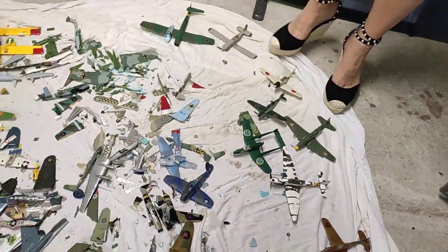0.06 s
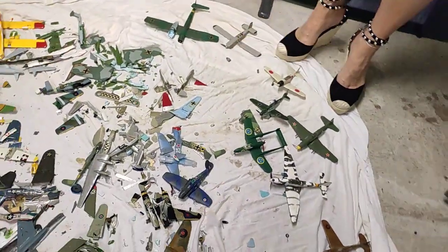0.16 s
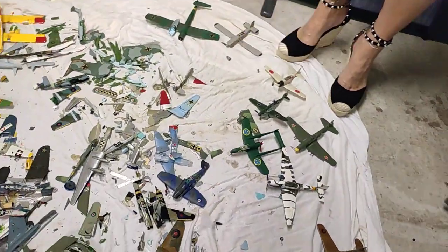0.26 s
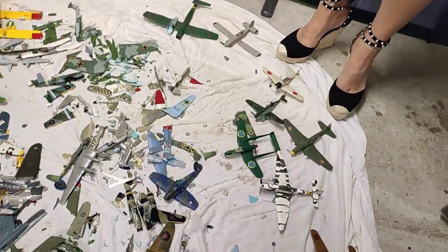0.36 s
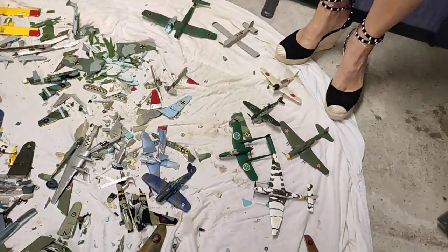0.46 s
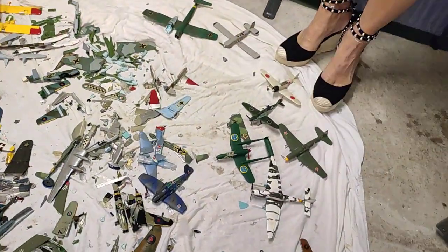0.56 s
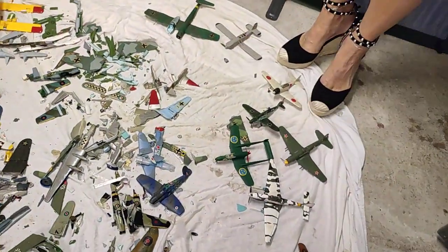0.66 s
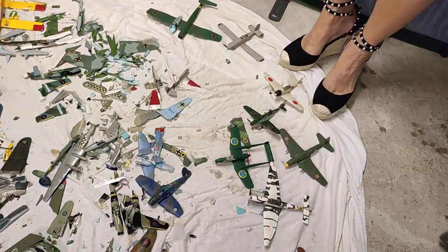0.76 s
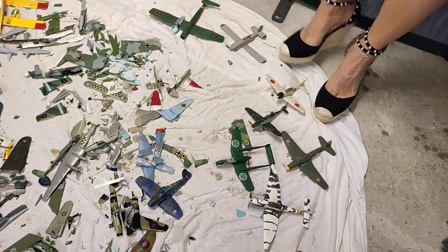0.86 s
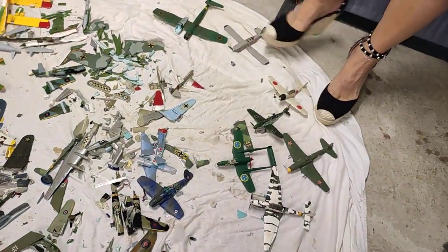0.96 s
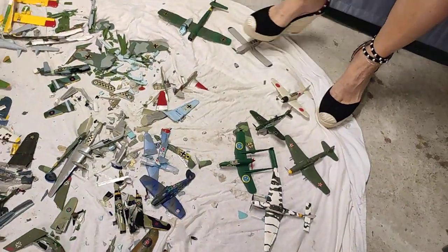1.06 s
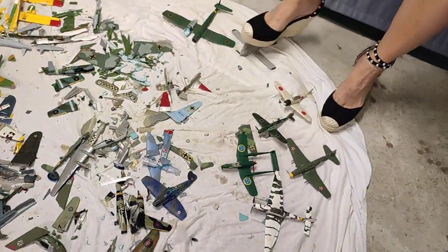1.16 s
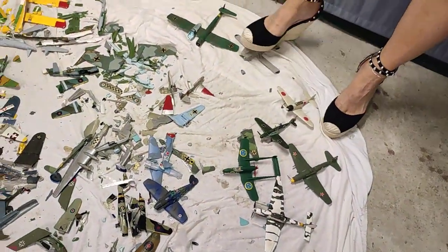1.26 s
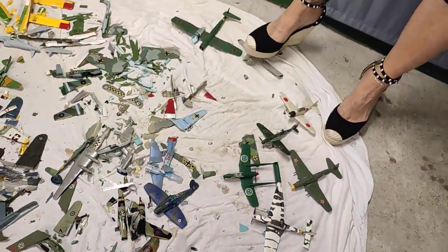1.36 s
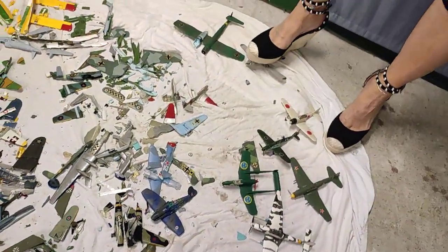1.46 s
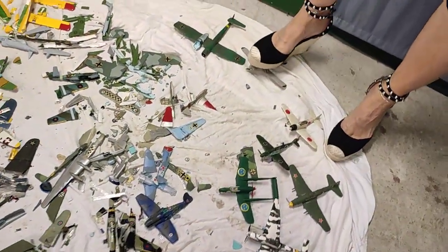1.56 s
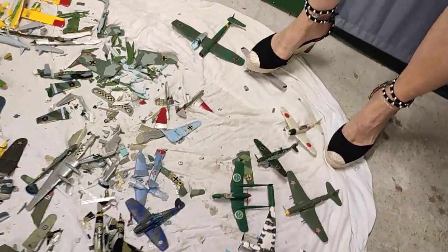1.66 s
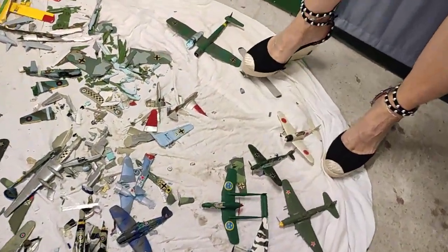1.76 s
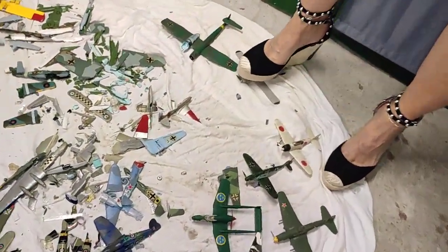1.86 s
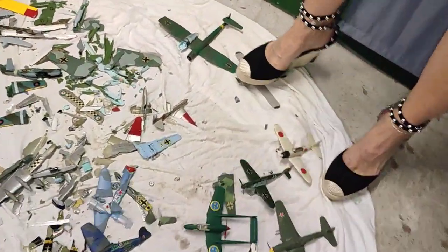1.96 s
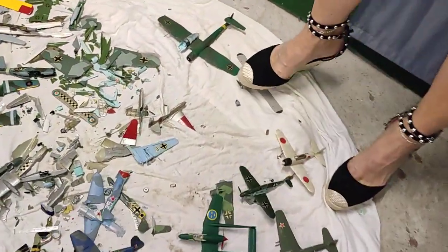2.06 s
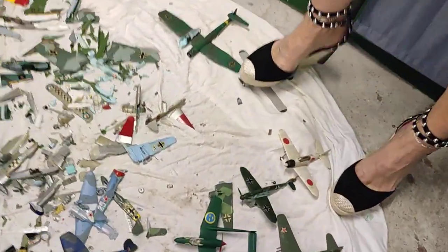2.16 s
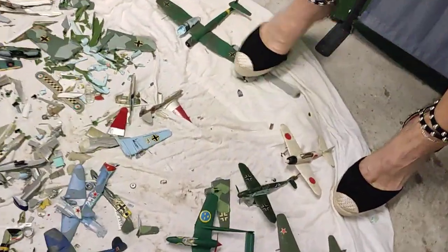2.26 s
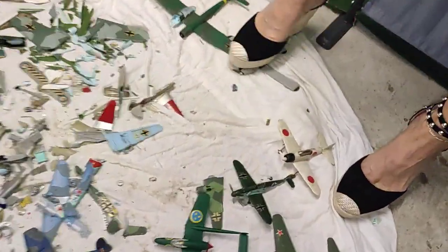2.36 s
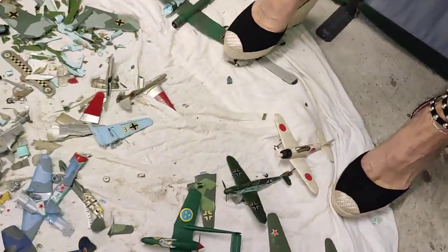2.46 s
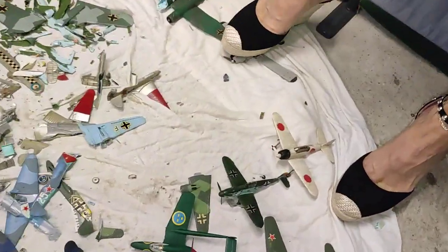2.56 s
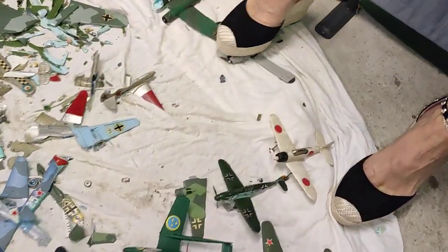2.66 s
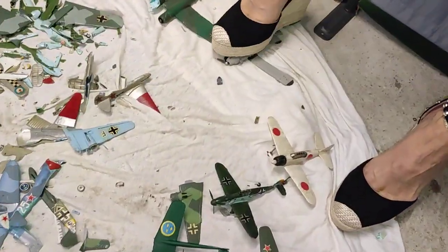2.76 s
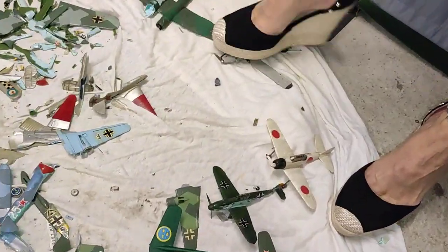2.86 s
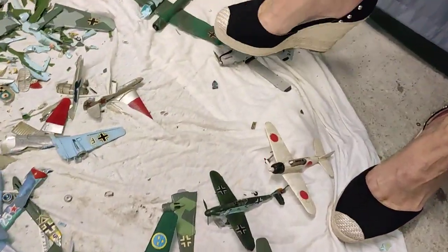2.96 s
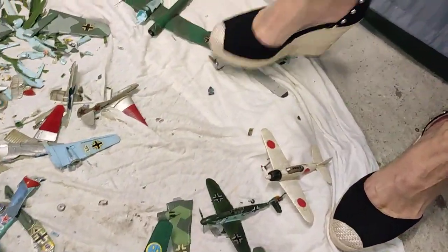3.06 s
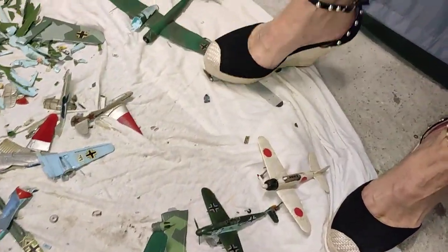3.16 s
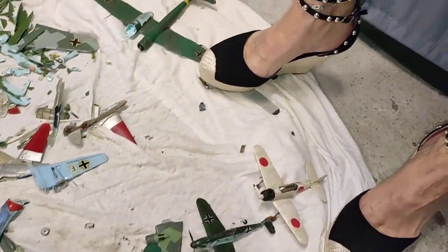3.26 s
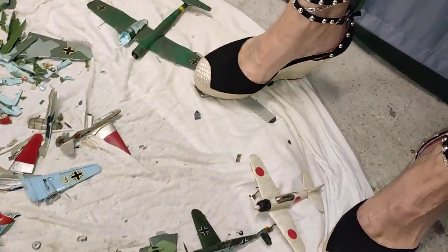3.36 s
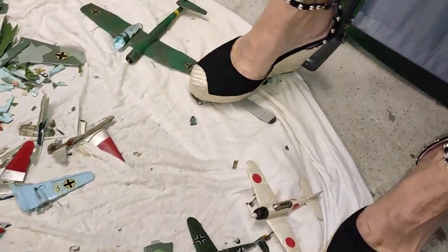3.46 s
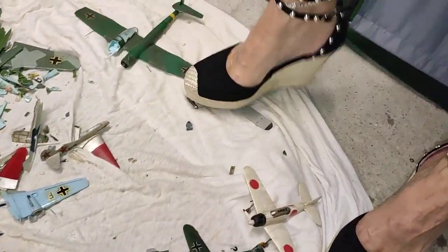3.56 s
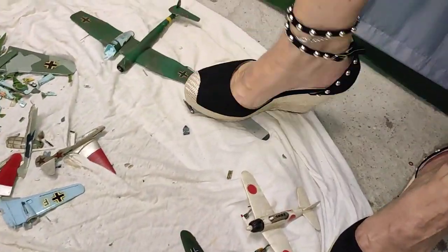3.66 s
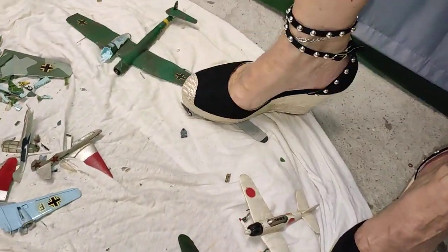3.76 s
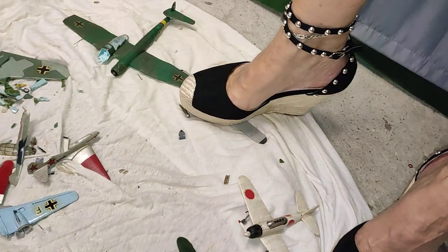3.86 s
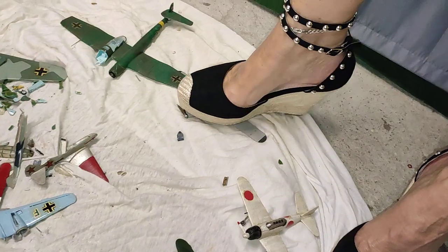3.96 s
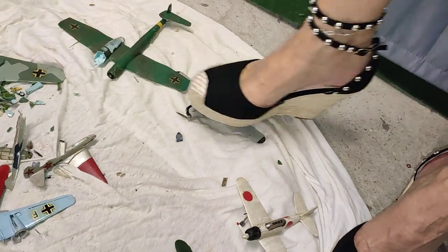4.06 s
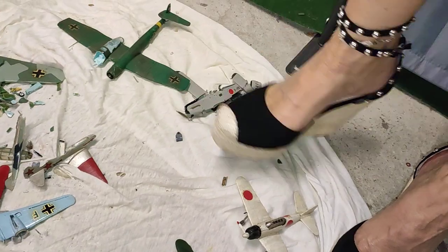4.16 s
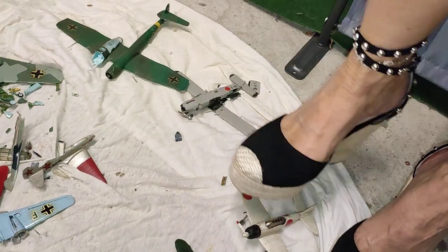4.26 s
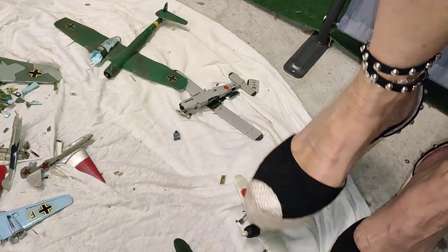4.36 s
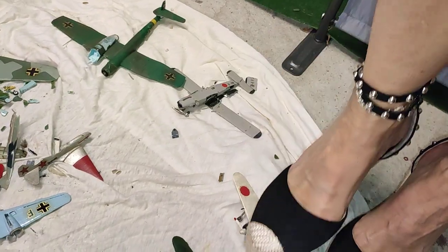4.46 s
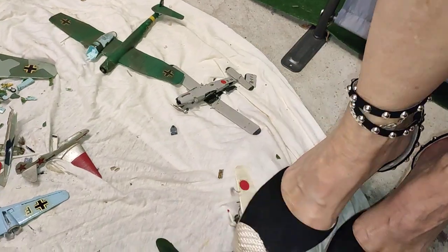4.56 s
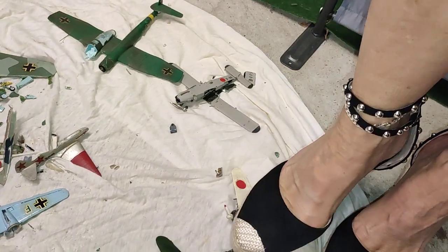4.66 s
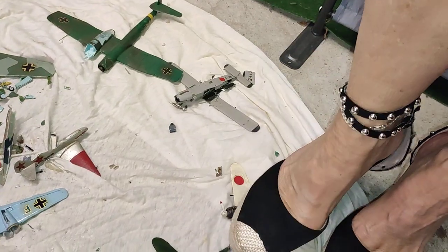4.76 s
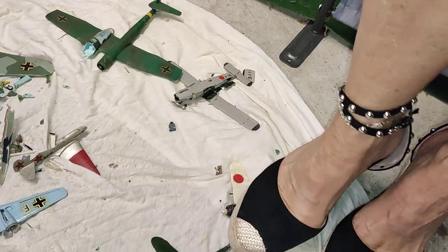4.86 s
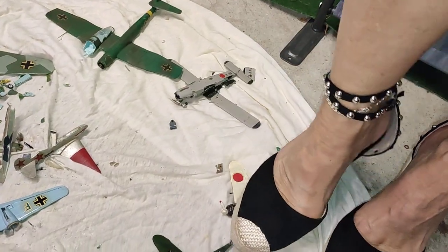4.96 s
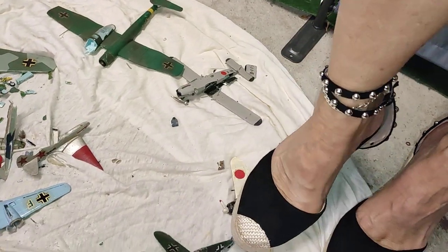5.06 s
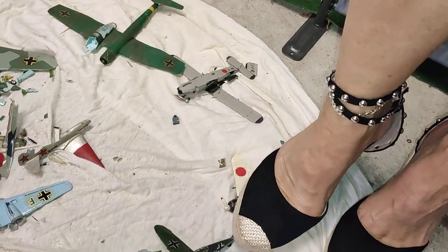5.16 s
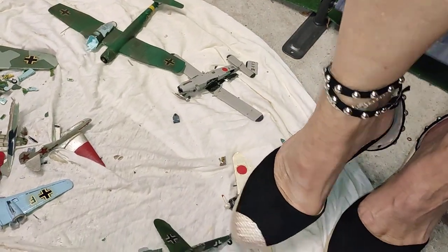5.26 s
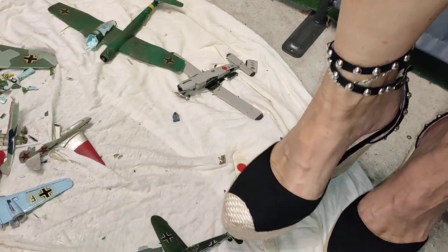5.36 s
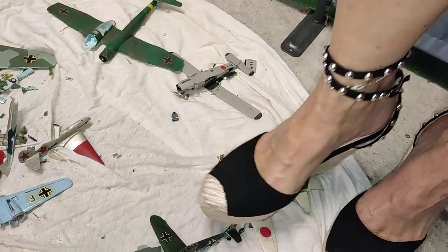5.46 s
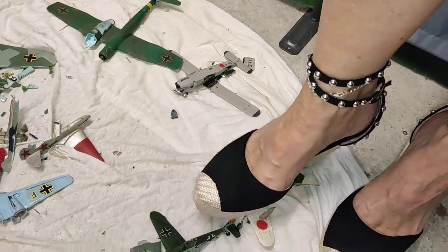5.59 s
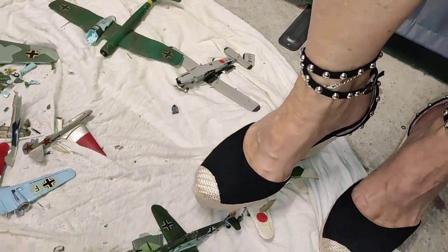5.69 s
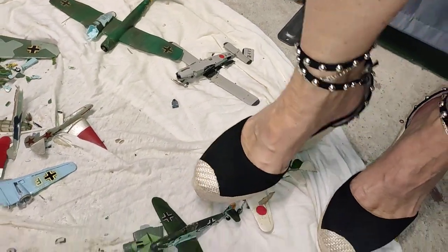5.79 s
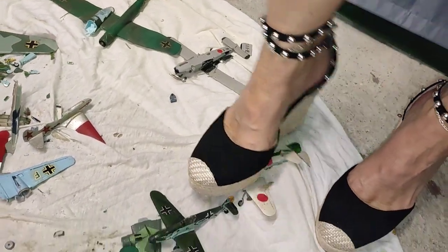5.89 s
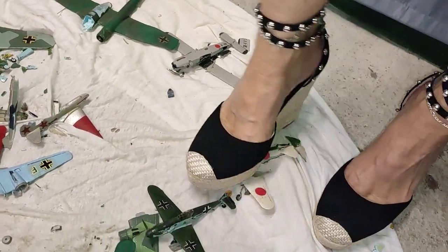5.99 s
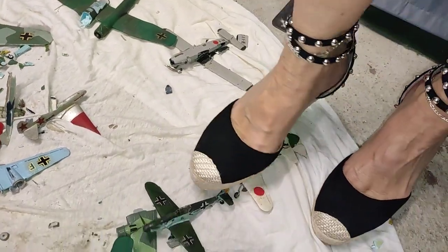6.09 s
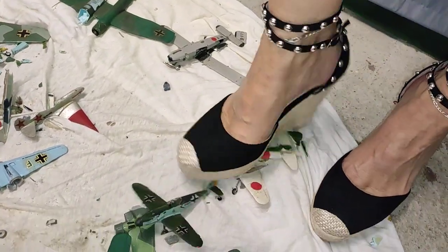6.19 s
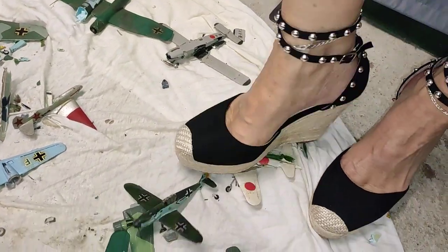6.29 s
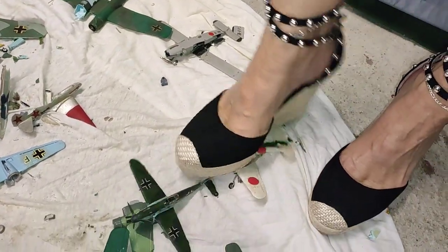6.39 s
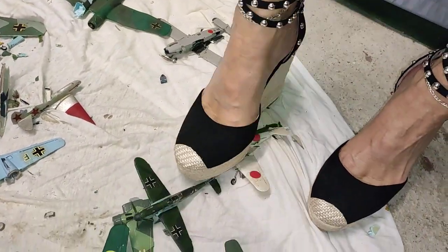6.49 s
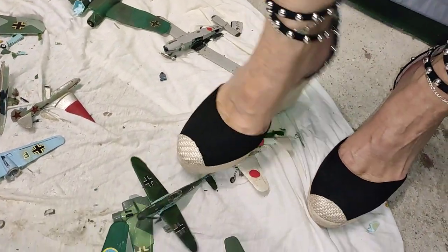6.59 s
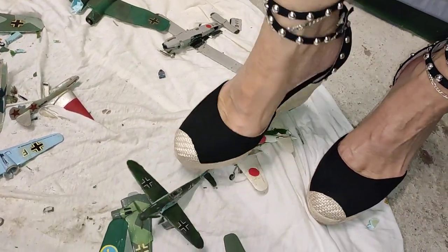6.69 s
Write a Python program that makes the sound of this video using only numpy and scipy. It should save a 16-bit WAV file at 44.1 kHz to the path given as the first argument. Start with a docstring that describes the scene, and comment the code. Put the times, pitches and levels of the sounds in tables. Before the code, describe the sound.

A sandal scuffs softly on a sheet over concrete, with a few faint squeaks further off. Then it treads on a plastic model plane, which breaks in sharp snaps and short crunches with dull thuds. After sparser, softer cracks, a second model caves in with a dense run of snaps and is ground under the sole, splinters crackling. A hand-held phone hears it close by in a small hard room.

```python
"""In a small hard room, a wedge sandal treads on plastic model aircraft lying on a sheet over concrete.
The thin shells give way in single snaps and short crunches, and splinters crackle under the sole.
Each break is a burst of noise plus a few fading tones. The shoe scuffs and thuds.
A few faint, short squeaks come from further off; room air, mains hum and hand rumble lie below.
A hand-held phone close by colours each side differently and turns down the loudest peaks."""
import sys
import numpy as np
from scipy import signal
from scipy.fft import rfft, irfft
from scipy.io import wavfile
from scipy.ndimage import uniform_filter1d, minimum_filter1d

SR = 44100
rng = np.random.default_rng(int(sys.argv[2]) if len(sys.argv) > 2 else 0)


def output_pcm(signal):
    """Save a mono or channel-first signal as 16-bit PCM at the path in sys.argv[1].

    Samples are clipped to [-1, 1] before scaling.
    """
    pcm = np.clip(np.atleast_2d(signal).T, -1, 1) * 32767
    wavfile.write(sys.argv[1], SR, np.round(pcm).astype(np.int16))


N = 296793
TIME = np.arange(N) / SR
CUTOFF_HZ = 14400


def from_db(db):
    """Turn decibels into a number to multiply a sound by."""
    return 10 ** (np.asarray(db) / 20)


def fade(t, fade_s):
    """Die away by 60 dB every fade_s seconds."""
    return from_db(-60 * t / fade_s)


def rms_one(x):
    """Scale a sound to an average strength (rms) of 1."""
    return x / np.sqrt(np.mean(x ** 2) + 1e-20)


def energy_one(x):
    """Scale a burst to the energy of a one-sample click of height 1."""
    return rms_one(x) / np.sqrt(x.shape[-1])


def level(rows):
    """A volume curve through rows of time_s, level_db."""
    return from_db(np.interp(TIME, *np.transpose(rows)))


def band(x, low_hz, high_hz, order=2):
    """Keep the part of a sound between two frequencies."""
    edges_hz = [low_hz, min(high_hz, .45 * SR)]
    return signal.sosfilt(signal.butter(order, edges_hz, "band", fs=SR, output="sos"), x)


def peak(x, hz, sharpness, db):
    """Boost or dip a sound around one frequency."""
    gain, angle = from_db(db / 2), 2 * np.pi * min(hz, .45 * SR) / SR
    width, turn = np.sin(angle) / (2 * sharpness), -2 * np.cos(angle)
    forward = [1 + width * gain, turn, 1 - width * gain]
    feedback = [1 + width / gain, turn, 1 - width / gain]
    return signal.lfilter(forward, feedback, x)


def add(out, start_s, sound):
    """Mix a stereo sound in at start_s."""
    at = max(0, round(start_s * SR))
    out[:, at:at + sound.shape[1]] += sound[:, :max(0, N - at)]


def stereo_noise(size, apart):
    """White noise; the larger apart is, the less alike the two sides are."""
    return rng.standard_normal(size) + apart * rng.standard_normal((2, size))


# The tone colour of the air: frequency_hz, relative_db
AIR_COLOUR = [(12, -42.5), (20, -0.5), (293, -21.5), (678, -24), (1150, -32.5), (2600, -34), (4500, -38.5),
              (8000, -39), (10000, -36), (14200, -38.5), (15000, -62)]


def room_air(level_db=-64.5):
    """Steady, mostly deep noise, a little louder on the right."""
    hz, db = np.transpose(AIR_COLOUR)
    colour = from_db(np.interp(np.log(np.fft.rfftfreq(N, 1 / SR) + 1), np.log(hz), db, left=-90))
    air = rms_one(irfft(rfft(stereo_noise(N, apart=.87)) * colour, N))
    return from_db(level_db) * air * from_db([[-.8], [.8]])


# How loud the hum is: time_s, level_db
HUM_LEVELS = [(0, -83), (2.4, -66), (3.5, -67), (6.73, -66)]


def mains_hum(pitch_hz=99.7):
    """Mains power hums on one low tone."""
    return level(HUM_LEVELS) * np.sqrt(2) * np.sin(2 * np.pi * pitch_hz * TIME)


# How loud the hand's movements are: time_s, level_db
HAND_LEVELS = [(0.0, -62), (1.37, -66.5), (2.32, -60.5), (2.62, -64), (4.35, -70), (5.02, -54), (5.72, -70),
               (5.96, -60), (6.73, -72)]


def hand_rumble():
    """The phone moves in the hand and makes a very deep rumble."""
    deep = band(stereo_noise(N, apart=.9), 7, 22, order=1)
    return level(HAND_LEVELS) * rms_one(band(deep, 7, 100))


# Faint squeaks from further off: start_s, length_s, level_db, pitch_hz
FAINT_DISTANT_SQUEAKS = [(0.022, 0.087, -66, 519), (0.741, 0.098, -68, 595), (0.884, 0.06, -59.5, 478),
                         (1.184, 0.115, -65, 416.6)]


def squeaks(sag=.02, overtone_db=-8, waver=.078, wavers_per_s=150):
    """Short, slightly hoarse tones that sag in pitch."""
    out = np.zeros((2, N))
    for start_s, length_s, db, hz in FAINT_DISTANT_SQUEAKS:
        along = np.linspace(0, 1, int(length_s * SR))
        jitter = np.interp(along * length_s * wavers_per_s, np.arange(100), rng.standard_normal(100))
        phase = 2 * np.pi * np.cumsum(hz * (1 + sag * (.5 - along) + waver * jitter)) / SR
        tone = sum(from_db(overtone_db * np.log2(k)) * np.sin(k * phase) for k in range(1, 5))
        add(out, start_s, from_db(db) * np.sin(np.pi * along) * np.array([tone, tone]))
    return out


# Soles rubbing over sheet and concrete: start_s, length_s, relative_db, centre_hz
SOLE_SCUFFS = [(0.187, 0.102, -65.5, 1170), (0.486, 0.11, -59, 2400), (.599, 0.079, -61, 1030),
               (0.698, 0.52, -65.5, 2600), (0.985, 0.12, -61.5, 1160), (1.148, 0.19, -60.5, 690),
               (1.498, 0.027, -65, 3500), (1.607, 0.17, -50.5, 760), (2.088, 0.12, -51, 885),
               (2.362, .17, -46, 1530), (2.885, 0.74, -50, 1000), (3.556, 0.26, -55, 1100),
               (4.117, 0.039, -44.5, 4570), (4.295, 0.037, -50.5, 4512), (4.4, 0.055, -51.5, 950),
               (5.647, 0.15, -54.5, 940), (6.404, 0.39, -54, 650)]


def scuffs(rise_share=.17, fall_share=.58, grain_db=3.5, grains_per_s=160, width=1.9, hiss_db=-22):
    """A rope sole drags in tiny catches: grainy noise that swells and fades, with a hiss of cloth."""
    out, t = np.zeros((2, N)), np.arange(SR // 2) / SR
    for start_s, length_s, db, hz in SOLE_SCUFFS:
        rise = np.clip(t / (rise_share * length_s), 0, 1)
        fall = np.clip((length_s - t) / (fall_share * length_s), 0, 1) ** .5
        grain = np.interp(t * grains_per_s, np.arange(200), rng.standard_normal(200))
        noise = stereo_noise(len(t), apart=.71)
        rub = band(noise, hz / width, hz * width, order=1)
        rub = rms_one(band(rub, 97, 3 * hz)) + from_db(hiss_db) * noise
        add(out, start_s, from_db(db - 6 + grain_db * grain) * rise * fall * rub)
    return out


# Weight landing on the floor: start_s, level_db, pitch_hz
FOOT_THUDS = [(.245, -47.5, 191), (1.051, -48.5, 266), (2.341, -38.5, 127), (2.774, -33.5, 134),
              (3.171, -32, 93.8), (4.92, -31, 141), (5.073, -36, 143), (6.07, -40, 138.9)]


def thuds(fade_s=.025, rise_s=.00093, knock_gain=.26):
    """The padded sole meets the floor: a low push that dies quickly, with a dull knock."""
    out, t = np.zeros((2, N)), np.arange(SR // 4) / SR
    shape = (1 - np.exp(-t / rise_s)) * fade(t, fade_s)
    for start_s, db, hz in FOOT_THUDS:
        push = np.sin(2 * np.pi * hz * t)
        knock = rms_one(band(stereo_noise(len(t), apart=.4), 82, 420))
        add(out, start_s, from_db(db) * shape * (push + knock_gain * knock))
    return out


# Filters for the shell's hollow body, its panels and the sharp broken edge: low_hz, high_hz
SHELL_BANDS = [signal.butter(2, hz, "band", fs=SR) for hz in [(650, 1580), (1900, 4650), (5300, 12560)]]


def fracture(hz, fade_s, body_db, edge_db, ring_db, shiver_db=-14, partials_db=-21, ring_cycles=24):
    """One break: a crack tears through, the freed piece rings and the shell shivers on."""
    t = np.arange(SR // 40) / SR
    tear, linger = 1 - np.exp(-t / .00017), fade(t, fade_s=.025)
    crack = energy_one(stereo_noise(len(t), apart=1.6) * tear * fade(t, .89 * fade_s))
    crack += from_db(shiver_db) * energy_one(rng.standard_normal((2, len(t))) * linger)
    body, panels, edge = (energy_one(signal.lfilter(b, a, crack)) for b, a in SHELL_BANDS)
    shell = energy_one(from_db(body_db) * body.mean(axis=0) + panels + from_db(edge_db) * edge)
    # each side hears the piece from its own angle; small, high pieces fall silent sooner
    tone = np.sin(2 * np.pi * (hz * t + rng.random((2, 1))))
    ring = energy_one(tone * tear * fade(t, min(fade_s, ring_cycles / hz)))
    # partials: three extra tones, out of tune with the ring
    partials_hz = np.minimum(hz * np.exp(rng.uniform(-.7, .9, (3, 1))), CUTOFF_HZ)
    partials = energy_one(rng.standard_normal((2, 3)) @ np.sin(2 * np.pi * partials_hz * t) * linger)
    return energy_one(shell + from_db(ring_db) * ring + from_db(partials_db) * partials)


def small_break(body_db, edge_db):
    """A piece of random size breaks with a very short ring."""
    high, hollow, sharp = rng.standard_normal(3)
    hz = np.clip(3500 * np.exp(.45 * high), 1000, 12000)
    return fracture(hz, .005, body_db + 3 * hollow, edge_db + 4 * sharp, ring_db=-8)


# The sole bearing down on loose splinters: start_s, length_s, relative_db
SOLE_PRESSES = [(1.755, 0.17, -39.5), (2.107, 0.41, -36.5), (3.526, 0.27, -47), (4.015, 0.15, -48),
                (4.264, 0.095, -68), (4.56, .5, -42), (5.326, 0.18, -42.5), (5.592, 0.27, -49),
                (6.081, 0.48, -42.5), (6.63, .1, -45.5)]


def splinters(per_s=150, rise_share=.69, fall_share=.43, swell_db=8.5, spread_db=4.5):
    """Loose bits tick at random, louder as the weight comes on and softer as it eases off."""
    out = np.zeros((2, N))
    for start_s, length_s, db in SOLE_PRESSES:
        count = int(length_s * per_s) + 1
        for along in (np.arange(count) + rng.random(count)) / count:
            weight = min(along / rise_share, 1, (1 - along) / fall_share)
            chance_db = spread_db * (min(rng.exponential(), 3) - 2)
            gain = from_db(db + swell_db * (weight - 1) + chance_db) * np.sqrt(SR / per_s)
            add(out, start_s + along * length_s, gain * small_break(body_db=-18.5, edge_db=-1))
    return out


# A whole shell caving in: start_s, length_s, level_db
SHELL_CRUNCHES = [(1.793, 0.0095, -28.5), (2.334, 0.023, -21), (3.163, .027, -30.5), (4.077, 0.015, -41.5),
                  (4.62, 0.0078, -24.5), (4.658, 0.0078, -29.5), (4.759, 0.0098, -21.5),
                  (4.801, .0072, -23.5), (4.925, 0.0071, -23), (5.063, .013, -17), (5.391, 0.022, -35)]


def crunches(per_s=900):
    """A caving shell is a rush of equally strong breaks that run into one another."""
    out = np.zeros((2, N))
    for start_s, length_s, db in SHELL_CRUNCHES:
        count = int(length_s * per_s) + 1
        gain = from_db(db) * np.sqrt(length_s * SR / count)
        for along in (np.arange(count) + rng.random(count)) / count:
            add(out, start_s + along * length_s, gain * small_break(body_db=-11.5, edge_db=1))
    return out


# The loudest snaps: start_s, energy_db, pitch_hz, hollow_body_db, sharp_edge_db
# One model gives way under the toe (from 1.8 s) and creaks as the foot rolls off (3.4 s).
# A second takes the full weight (4.6 s) and is ground under the sole (5.4 s).
PLASTIC_SNAPS = [ (1.7763, -2.5, 2467, -29, 3), (1.781, -1, 3840, -6.5, -1.5),
                 (1.7981, 14, 5480, -9.5, 9.5), (1.8659, -5.5, 2760, 4, 12.5),
                 (1.9071, -3, 5900, -17, 17.5), (2.001, -30, 1580, 4, -15), (2.113, -15, 5500, -16, -4),
                 (2.1307, -8.5, 2730, -30, -37), (2.1488, -3.5, 5640, -14, 2.5),
                 (2.2127, -8.5, 4630, -4, 27), (2.2366, 10.5, 2636, -19.5, -10),
                 (2.2491, 2, 3107, 10.5, 14.5), (2.2599, 2.5, 5000, -5.5, 4), (2.32, -10, 3100, -22, 1),
                 (2.3256, 2, 3320, -34, -2.5), (2.3412, 17.5, 3170, -14.5, 5.5),
                 (2.5874, -14, 5080, -7.5, 7.5), (2.6724, 5, 2345, -11.5, 1), (2.772, 8, 6120, -6, 2.5),
                 (2.865, 5.5, 4450, -8, 1.5), (2.8795, -14.5, 3160, 6, 0), (2.9851, -14.5, 3320, -3, -3.5),
                 (3.1703, -2.5, 5160, -11.5, -4.5), (3.197, -6, 3070, -3.5, -3.5),
                 (3.4485, -17.5, 3230, -5, -15.5), (3.466, -2.5, 4080, -14, -12.5),
                 (3.5438, -14.5, 2800, -16, 1.5), (3.583, -14.5, 3200, -20, -20),
                 (3.6092, -14.5, 3300, -7, -18), (3.6308, -10.5, 2900, -23, -16),
                 (3.785, -19, 2522, -26, -10.5), (4.0408, -20, 1397, -3.5, -13),
                 (4.077, -21, 4650, -21, -7), (4.3741, -25.5, 5040, -8, 0), (4.6048, -2, 2371, -18.5, 2.5),
                 (4.623, 3.5, 4600, -14, 32), (4.67, -6, 1420, -2, -18), (4.6936, -3.5, 5610, -12, 0),
                 (4.7218, -2.5, 7100, -3, 15), (4.757, 4.5, 4020, -4.5, 6.5), (4.7624, -1.5, 3850, 11, 8),
                 (4.783, -1.5, 2445, -7, -7), (4.802, 5, 1884, -4, 3), (4.8558, 7.5, 7270, -12.5, 0.5),
                 (4.9051, 10, 6180, -19, 10), (4.9102, 2, 7300, -7.5, -3), (4.926, 4, 2992, 0, 4.5),
                 (4.9674, -6, 4342, -9, 2), (4.989, 2, 2222, -8.5, 1.5), (5.0337, -4, 7900, -6, 6),
                 (5.058, 1, 2560, -19, 4), (5.0645, 6.5, 7640, 8, 16), (5.068, 9, 7950, -1.5, 8.5),
                 (5.3706, -12.5, 2545, -13, -9.5), (5.4166, -11.5, 3120, -24, -20),
                 (5.449, -17, 2940, -32, 3), (5.5667, -14.5, 3320, -42, -0.5),
                 (5.584, -15.5, 2650, -11, -27), (5.6082, -15, 2928, -32, 6), (5.6928, -18.5, 4850, -9, -5),
                 (5.7132, -8.5, 5840, -13, 5), (5.7416, 3.5, 2990, -13.5, -0.5), (5.7558, -12, 7620, 2, 8),
                 (5.855, 4, 3500, -16, 3.5), (5.8649, 3.5, 3300, -6, 2.5), (5.896, 7, 7967, -7, 1),
                 (5.9584, -2, 6700, -34, 7), (5.987, -2.5, 2970, -19, 0), (5.9956, -8.5, 2649, -26, -24),
                 (6.129, -6, 6450, -21, -0.5), (6.141, -9, 1630, -13, -31), (6.1557, 5.5, 2750, -14, 1),
                 (6.164, -4, 5300, -17, 6), (6.246, -5.5, 2980, -16, -1), (6.2833, -6.5, 3592, -7, 6),
                 (6.333, -13.5, 5470, 3, 16), (6.36, -7.5, 2600, -52, 5), (6.3839, 2.5, 1910, -22, 6),
                 (6.4027, -6.5, 3680, -12, -20), (6.4131, 2, 3130, -4.5, 5.5),
                 (6.4251, 2, 5100, -11.5, 4.5), (6.454, -9.5, 2967, 6.5, 13.5),
                 (6.5007, -5, 5580, -7.5, 3.5), (6.6382, -8, 6000, -17, 1.5), (6.7057, -1, 2900, -14, -2)]


def snaps(ring_db, fade_s=.0097):
    """Wings, struts and aircraft bodies break one by one."""
    out = np.zeros((2, N))
    for start_s, db, hz, body_db, edge_db in PLASTIC_SNAPS:
        add(out, start_s, from_db(db) * fracture(hz, fade_s, body_db, edge_db, ring_db))
    return out


def on_floor(plastic, floor_db=9):
    """The floor passes on a dull share of every break."""
    return plastic + from_db(floor_db) * band(plastic.mean(axis=0) + 1e-18, 93, 290.3)


# The echo of the room: frequency_hz, level_db, fade_s
ROOM_ECHO = [(125, -2, 0.92), (397, -1, 0.46), (970, -5.5, 0.28), (2540, -10, 0.52), (5200, -5.5, 0.35),
             (8000, -12, 0.29), (13900, -11, 0.23)]


def room(x, build_s=.0004, first_echo_s=.00033, alike_hz=1500):
    """Echoes off hard walls blur together and die sooner in the treble; lows reach both sides alike."""
    t, tail = np.arange(SR) / SR, 0
    hz, levels_db, fades_s = np.transpose(ROOM_ECHO)
    edges_hz = np.geomspace(60, 18000, 12)
    swell = 1 - np.exp(-np.maximum(t - first_echo_s, 0) / build_s)
    for low, high in zip(edges_hz, edges_hz[1:]):
        centre = np.sqrt(low * high)
        db, fade_s = (np.interp(np.log(centre), np.log(hz), column) for column in (levels_db, fades_s))
        noise = band(stereo_noise(SR, apart=.1 + centre / alike_hz), low, high, order=3)
        echoes = energy_one(noise * swell * fade(t, fade_s))
        tail = tail + from_db(db) * echoes * np.sqrt(2 * (high - low) / SR)
    return signal.fftconvolve(x, tail, axes=1)[:, :N]


# The tone colour of each microphone opening: frequency_hz, sharpness, boost_db
LEFT_OPENING = [(385, 2.1, 6.5), (1350, 3.95, 7), (7920, 1.05, 7.5), (9960, 2.7, -13), (13170, 4.3, 3.5)]
RIGHT_OPENING = [(1450, 2.0, 5), (2780, 2.6, 12), (5200, 1.5, 4), (13200, 1, -1), (8450, 2.2, -17)]


def microphone_openings(x):
    """Each microphone sits behind a small hole that boosts some frequencies and dips others."""
    sides = []
    for side, opening in zip(x, (LEFT_OPENING, RIGHT_OPENING)):
        for hz, sharpness, db in opening:
            side = peak(side + 1e-18, hz, sharpness, db)
        sides.append(side)
    return np.array(sides)


def scene(lean_right_db=1, right_delay_s=.00004):
    """Plastic, feet and squeaks arrive directly, a little louder on the right, and off the walls."""
    background = room_air() + mains_hum() + hand_rumble()
    soft_sounds = scuffs() + squeaks() + thuds()
    debris = splinters() + crunches()
    left, right = on_floor(snaps(ring_db=-3.5) + debris) + soft_sounds
    right = np.interp(TIME - right_delay_s, TIME, right)
    direct = np.array([left, right]) * from_db([[-lean_right_db], [lean_right_db]])
    # a piece beams its ring one way, so the walls get mostly the crack
    walls = room(on_floor(snaps(ring_db=-11.5) + debris) + soft_sounds)
    return microphone_openings(direct + walls + background)


def record(dry, ceiling=.82, hold_s=.0011):
    """The phone briefly turns down the loudest peaks and cuts the highest treble."""
    size = int(hold_s * SR) + 1
    gain = ceiling / np.maximum(np.abs(dry).max(axis=0), ceiling)
    limited = dry * uniform_filter1d(minimum_filter1d(gain, size), size)
    return signal.sosfilt(signal.ellip(8, .3, 70, CUTOFF_HZ, fs=SR, output="sos"), limited)


dry = scene()
out = record(dry)
output_pcm(out)
```